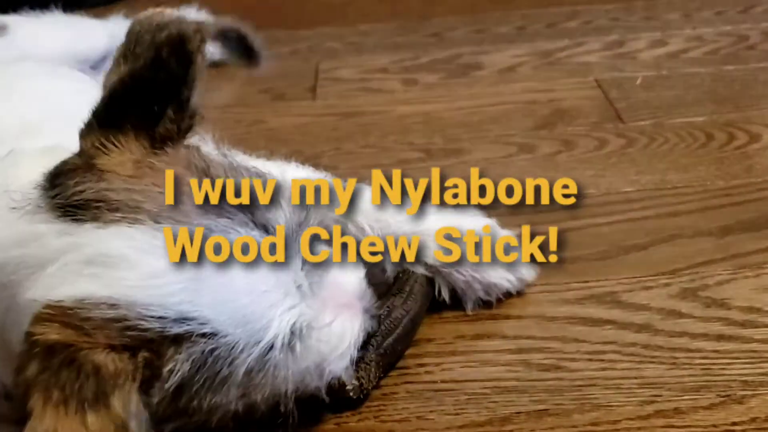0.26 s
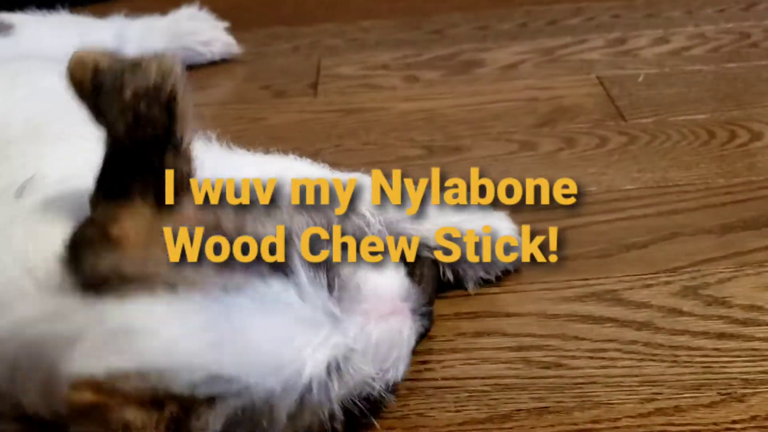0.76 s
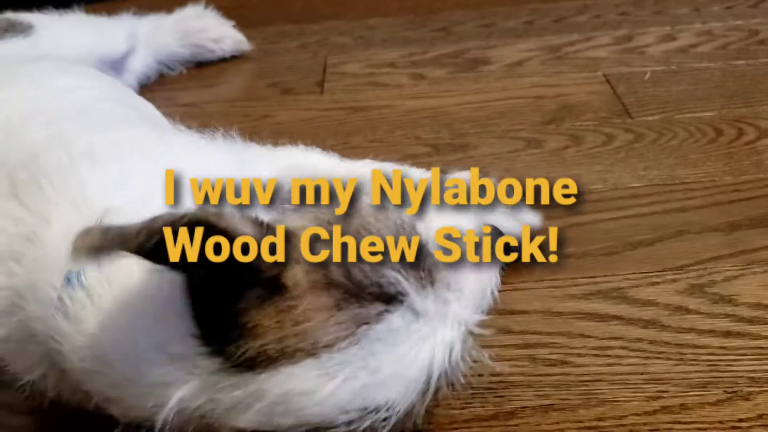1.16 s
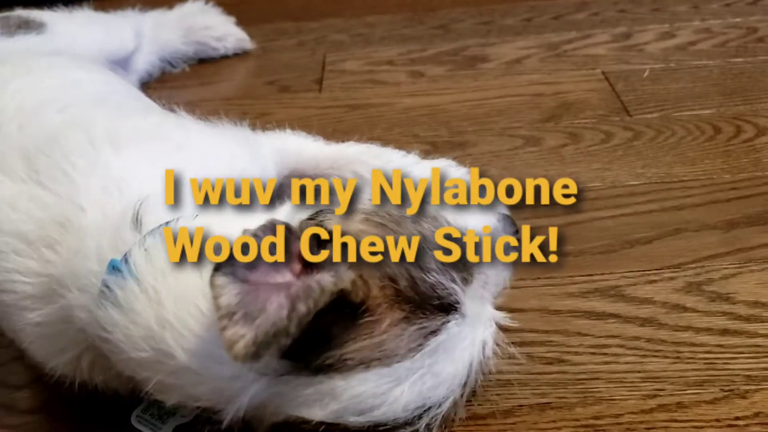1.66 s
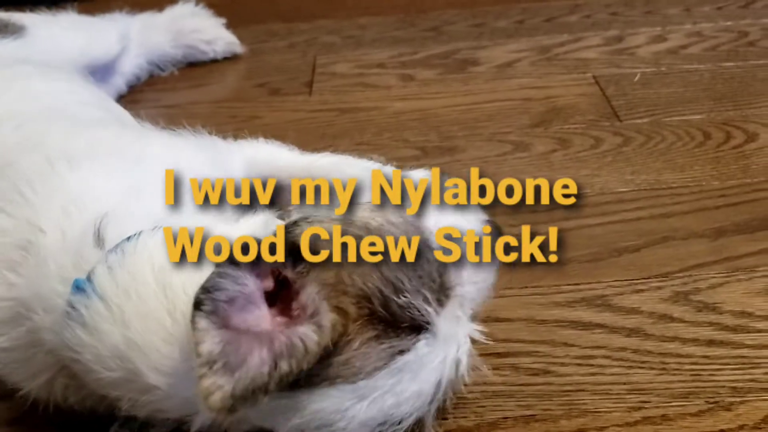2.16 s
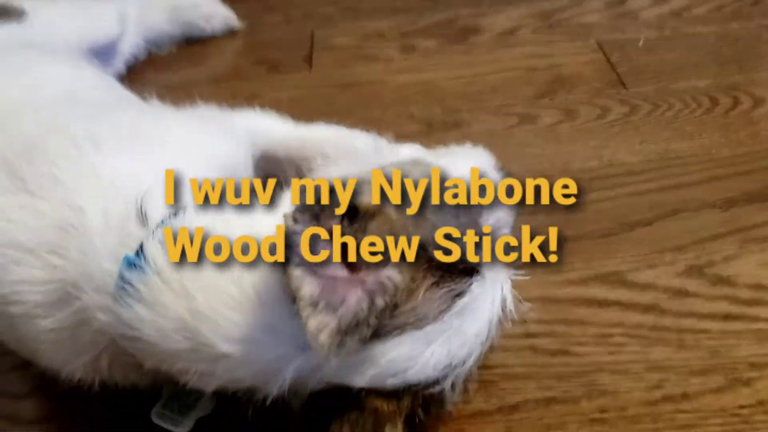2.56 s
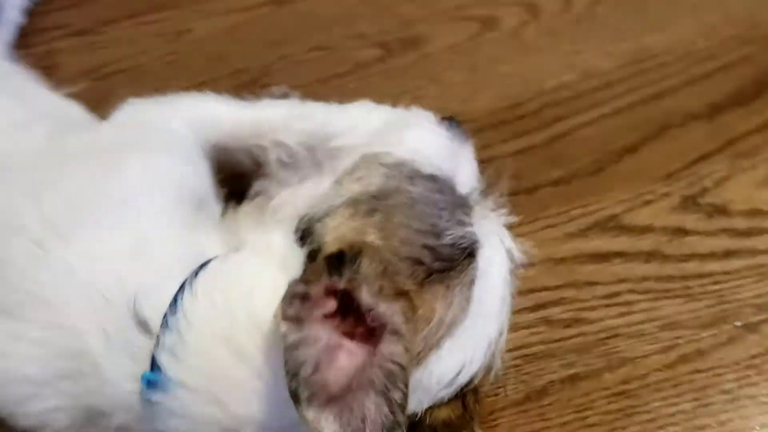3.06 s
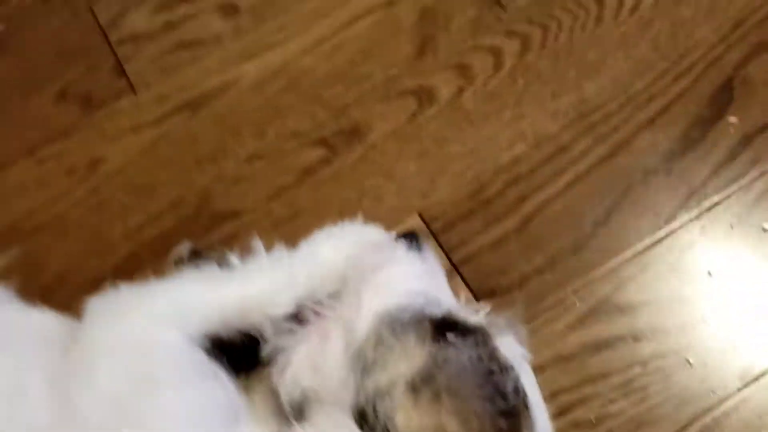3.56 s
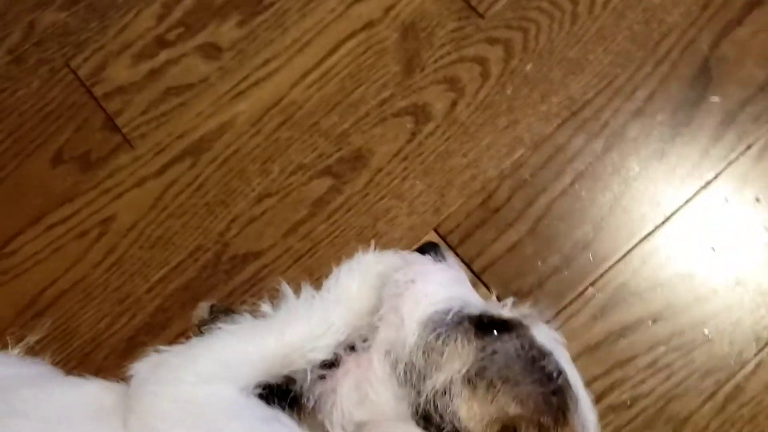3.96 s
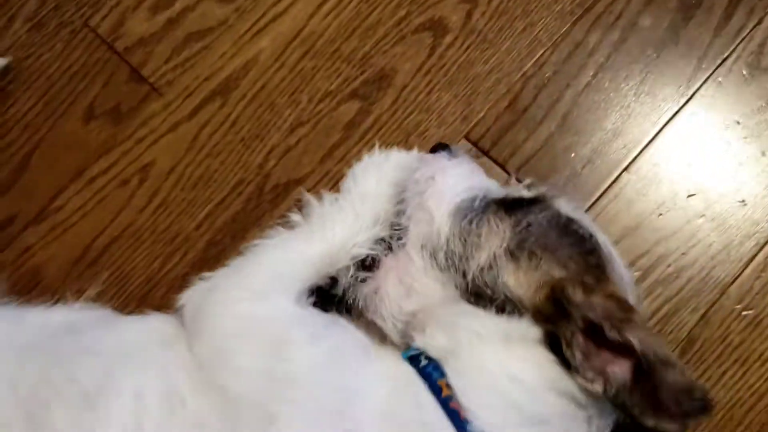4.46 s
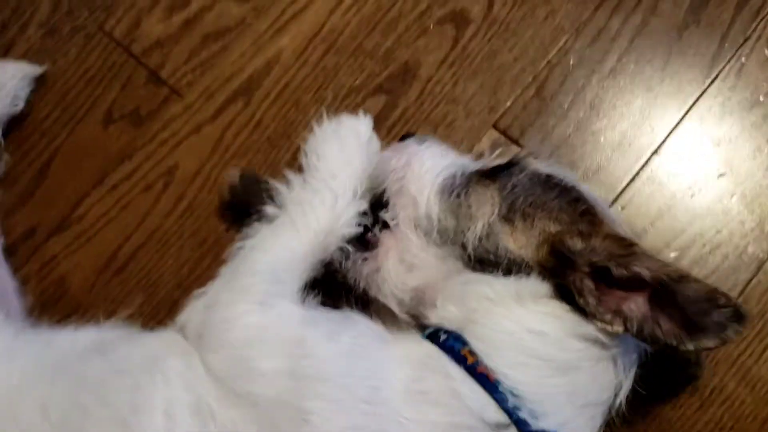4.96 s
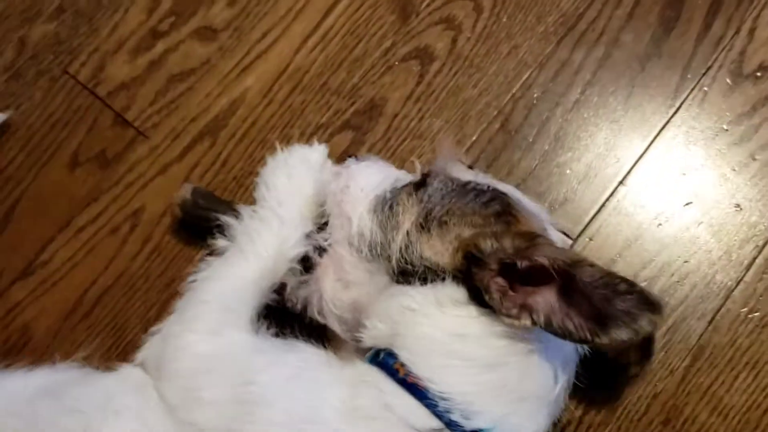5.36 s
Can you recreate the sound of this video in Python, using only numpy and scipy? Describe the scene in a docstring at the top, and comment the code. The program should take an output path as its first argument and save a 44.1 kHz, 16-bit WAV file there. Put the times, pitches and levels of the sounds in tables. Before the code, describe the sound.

In a bare, quiet room with a faint low hum, a dog works at a hard stick on the floorboards. After one loud clatter of teeth and stick, light irregular taps and scrapes go on, then harder knocks and dry cracks come in clusters as the teeth slip off. Tiny ticks and soft rubbing of fur are heard nearby. Everything is close, slightly to the left and lightly reverberant.

```python
"""A puppy gnaws a hard chew stick on the wooden floor of a bare room. Each impact excites damped modes
of the stick and the boards; hard blows crack, and teeth slipping off the stick give a dry crunch.
Dragging drives the same wood by stick-slip friction in short grainy scrapes. Small bright ticks and
the rustle of fur come from close by. The contacts reverberate over faint room noise and the hum of an
appliance, whose low tones beat."""
import sys
import numpy as np
from scipy import signal
from scipy.io import wavfile

SR = 44100
rng = np.random.default_rng(int(sys.argv[2]) if len(sys.argv) > 2 else 0)


def dump_mix(stems):
    """Bounce the given channels to the path in sys.argv[1] as a 16-bit WAV at rate SR."""
    frames = np.atleast_2d(stems).T  # one column per channel
    limited = np.clip(frames, -1, 1)  # hard clip at full scale
    pcm = np.round(limited * 32767).astype(np.int16)
    wavfile.write(sys.argv[1], SR, pcm)


N = 247401

# Room noise and the coarser and finer hiss of fur: f/Hz, relative spectral density/dB
AIR_SPECTRUM = [(53, -39.5), (90, -7), (164, -10.5), (510, -26.5), (799, -37), (1490, -37.5), (5140, -51.5),
                (7400, -51.5), (8600, -64.5), (13800, -52.5), (15000, -61)]
COARSE_FUR_SPECTRUM = [(1470, -17.5), (2500, -11), (3450, -10.5), (3800, -14), (7670, -8.5), (8500, -16),
                       (11000, -44), (18700, -120)]
FINE_FUR_SPECTRUM = [(5180, -40), (8800, -17), (14000, 9), (14700, -7), (15000, -10)]
# Reverberation time: f/Hz, T60/s
ROOM_T60 = [(100, 0.64), (260, 0.21), (700, 0.39), (1800, 0.55), (4800, 0.48), (12000, 0.55)]
# Initial spectrum of the reverberation: f/Hz, relative level/dB
ROOM_SPECTRUM = [(100, -28.5), (260, -19), (700, -21), (1800, -22), (4800, -20), (8000, -20.5),
                 (13000, -50)]
# Likeness of left and right in the diffuse field: f/Hz, correlation
COHERENCE = [(60, 0.45), (250, 0.88), (700, 0.38), (1500, -0.14), (5000, 0.027), (14000, -0.23)]
# Partials of the appliance: f/Hz, level/dB, wavering/dB
HUM_PARTIALS = [(59.2, -52, 1), (74, -58, 2), (120, -66, 2)]
# Slow swell of the hum: t/s, gain/dB
HUM_SWELL = [(0, 0.5), (1.2, -1.5), (2.2, -2), (3.0, 3), (4.3, 2), (5.61, -0.5)]
# Envelopes of fur rubbing and of the stick dragging on the boards: t/s, level/dB
FUR_RUB = [(0, -58), (.04, -66), (.07, -52), (.3, -99), (.55, -84.5), (.84, -86), (1.67, -85), (2.2, -88),
           (2.62, -76), (2.88, -70.5), (2.98, -58), (3.07, -61.5), (3.14, -85), (3.6, -70.5), (3.9, -83.5),
           (4.17, -79), (4.5, -65.5), (4.75, -70), (5.03, -83), (5.3, -81), (5.45, -70.5), (5.61, -81.5)]
STICK_DRAG = [(0, -40), (.25, -55.5), (.61, -87), (1.11, -63), (1.25, -91), (1.48, -57.5), (1.65, -77),
              (2.05, -75), (2.45, -57.5), (2.95, -68), (3.11, -50), (3.34, -65), (3.82, -54), (4.0, -83),
              (4.29, -43.5), (4.42, -65), (4.63, -50.5), (4.95, -78.5), (5.2, -48), (5.61, -71.5)]
# Sudden stirs of the fur: t/s, coarse level/dB, fine level/dB, decay rate/(dB/s)
FUR_STIRS = [(0.849, -76, -69, 149), (0.961, -60, -58, 207), (1.92, -87, -102, 58), (4.178, -57.5, -56, 81),
             (4.871, -71, -68, 14)]
# Normal modes of the boards, stick, cracks, crunches and ticks: f/Hz, gain/dB, T60/s
BOARD_MODES = [(98.1, -34, 0.08), (169, -5.5, 0.15), (255, -2, 0.044), (319, 0, 0.019), (388, -4.5, 0.046),
               (475.6, -2, 0.037), (584, -5.5, 0.035)]
STICK_LOW_MODES = [(714, -5.5, 0.028), (768.5, -4.5, 0.022), (1005, -3.5, 0.0076)]
STICK_HIGH_MODES = [(1080, 1, 0.014), (1210, 0, 0.0068), (1429, -3.5, 0.022), (1620, -1.5, 0.0061),
                    (1762, -3.5, 0.014), (2038, -5.5, 0.012), (2060, -11.5, 0.033)]
CRACK_MODES = [(2270, 4, 0.0083), (2680, -5.5, 0.0042), (2783, -6.5, 0.008), (3590, -21, 0.0052)]
CRUNCH_MODES = [(2120, 5.5, 0.0046), (2544, 4, 0.01), (2880, -0.5, 0.0034), (3800, 0, 0.003),
                (5250, -5.5, 0.00091), (7000, -8, 0.0014)]
TICK_LOW_MODES = [(6150, -16.5, 0.012), (7540, 3.5, 0.015)]
TICK_HIGH_MODES = [(10200, -8, .003), (12500, -6, .003), (14100, -2, .005)]
# Where the held stick responds best, among its low and its high modes: t/s, f/Hz
STICK_LOW_CENTRE = [(0, 888), (1.2, 849), (2.1, 843), (3.08, 944), (3.7, 815), (4.2, 770), (4.35, 780),
                    (4.9, 760), (5.61, 760)]
STICK_HIGH_CENTRE = [(0.045, 1310), (0.067, 1820), (0.1, 1680), (0.5, 1490), (1.013, 2060), (1.12, 1540),
                     (1.25, 1360), (2.09, 1437), (2.55, 1350), (3.0, 1460), (3.09, 1590), (3.3, 1500),
                     (3.71, 1614), (4.18, 1760), (4.25, 1480), (4.32, 1730), (4.36, 1470), (4.65, 1250),
                     (4.9, 1820), (5.05, 1570), (5.19, 1580), (5.61, 1380)]
# Bright ticks: t/s, drive level of low modes/dB, of high modes/dB
TICKS = [(0.0707, -72, -29), (0.509, -90, -69.5), (0.85, -58.5, -72), (0.9607, -60.5, -46.5),
         (0.9729, -62, -46), (1.056, -64, -76), (1.921, -75.5, -84.5), (2.2438, -71.5, -51.5),
         (2.796, -66, -51), (3.086, -78.5, -49), (3.711, -68, -83), (3.747, -64.5, -77), (4.182, -62, -60),
         (4.2696, -60, -46), (4.3181, -82, -49), (5.084, -68, -53.5)]
# Teeth slipping off the stick: t/s, drive level/dB, centre f/Hz, chatter decay time/ms
CRUNCHES = [(0.0434, -35, 3800, 1.5), (0.0674, -11, 2440, 4.5), (0.0848, -28, 2300, 2),
            (0.0985, -22.5, 2500, 2.8), (0.85, -50, 3520, 0.43), (0.9725, -63, 4750, 2),
            (1.011, -48, 2400, 0.82), (1.2395, -45, 2680, 0.9), (2.092, -48, 2320, 1.8),
            (3.084, -20.5, 3600, 3.6), (3.301, -38.5, 2430, 2.7), (4.181, -25.5, 5320, 3.6),
            (4.3182, -24, 2750, 2.2), (4.3645, -55, 2800, 2), (4.905, -26.5, 2280, 1),
            (4.922, -46, 3000, 10), (5.0547, -40, 2300, 2), (5.1848, -31, 2320, 5)]
# Blows of the stick: t/s, drive level of boards/dB, of low stick modes/dB, of high stick modes/dB,
# centre f of boards/Hz, chatter decay time/ms
KNOCKS = [(0.0446, -9.5, -20, -16, 467, 5), (0.0684, -9, -17, -12, 535, 4.4),
          (0.0754, -10.5, -36, -36, 305, 6.2), (0.0837, -19.5, -15, -19.5, 342, 5.1),
          (0.0985, -15.5, -21.5, -15.5, 376, 18), (0.508, -39, -52.5, -42, 318, 17),
          (0.54, -29.5, -38.5, -45.5, 412, 1.7), (0.5733, -34.5, -75.5, -57.5, 343, 5.4),
          (0.585, -40, -65, -62, 348, 7), (0.6323, -33.5, -45, -51, 436, 0.75),
          (0.8475, -51, -52, -48, 344, 0.47), (1.013, -75, -66, -41.5, 209, 0.4),
          (1.063, -33, -47, -71, 346, 42), (1.112, -30.5, -41.5, -46, 364, 13),
          (1.124, -37.5, -41, -42.5, 410, 0.63), (1.1427, -31.5, -42, -39.5, 440, 1.4),
          (1.1634, -27, -41.5, -61, 364, 6.4), (1.2148, -23.5, -34.5, -36.5, 448, 0.43),
          (1.2276, -21, -33, -27.5, 430, 15), (1.2354, -61, -36, -33, 497, 7.4),
          (1.247, -34, -29, -35.5, 410, 3.4), (1.3347, -38.5, -33.5, -45, 422, 6.9),
          (1.346, -34.5, -74.5, -42.5, 464, 53), (1.4419, -42.5, -51.5, -66, 451, 17),
          (1.4847, -40.5, -75, -79, 412, 1.06), (1.5222, -46, -68, -55, 366, 1.96),
          (1.5507, -29.5, -48.5, -53, 380, 13), (1.6013, -38, -65.5, -57.5, 408, 18),
          (1.619, -36, -62.5, -59.5, 462, 11.5), (1.784, -42, -67.5, -65.5, 461, 9.8),
          (1.9139, -36.5, -68.5, -72, 487, 2.05), (1.9949, -30.5, -50.5, -68.5, 416, 6.9),
          (2.0748, -22, -62, -83.5, 349, 9.7), (2.09, -20.5, -29, -26, 532, 6.7),
          (2.326, -37.5, -59, -56, 239, 16), (2.4072, -38.5, -61.5, -49.5, 248, 3.9),
          (2.433, -32.5, -69, -58.5, 403, 1.1), (2.4474, -17.5, -32, -33.5, 390, 3.5),
          (2.4785, -21, -28.5, -27.5, 463, 0.56), (2.539, -27, -32, -37.5, 431, 1.5),
          (2.688, -35, -56, -62.5, 323, 2.3), (2.842, -30.5, -78, -57.5, 345, 4),
          (2.95, -32.5, -41.5, -60, 420, 0.79), (2.978, -26.5, -51, -51, 307, 15),
          (2.996, -26.5, -65, -43, 390, 14), (3.0069, -11, -15.5, -24, 388, 2.5),
          (3.0839, -11, -16.5, -13.5, 416, 0.086), (3.0988, -20.5, -36, -28, 460, 5.6),
          (3.2789, -17.5, -30, -75, 390, 21), (3.3003, -21.5, -30, -24.5, 399.3, 11),
          (3.4229, -30.5, -42, -64, 204, 0.23), (3.5032, -29, -54, -50, 220.6, 2.5),
          (3.514, -27.5, -25, -87, 474, 10), (3.538, -32, -63, -72, 278, 6.1),
          (3.5981, -23.5, -34.5, -39, 410, 10.4), (3.6533, -25, -36, -46, 413, 5.2),
          (3.693, -26, -60, -62, 350, 0.95), (3.7126, -20, -21.5, -24.5, 410, 5.3),
          (4.003, -40.5, -62.5, -73, 360, 12), (4.106, -26.5, -43, -74, 225, 23),
          (4.1804, -11, -14.5, -22.5, 410, 4), (4.242, -26, -32, -29, 388, 22),
          (4.3183, -17.5, -18.5, -21, 420, 4.2), (4.351, -25, -22, -26.5, 394, 6.2),
          (4.3639, -21, -18.5, -27, 427, 10.7), (4.599, -25, -31.5, -38, 388, 30),
          (4.645, -28, -26, -30, 250, 68), (4.6539, -28, -32, -35.5, 440, 0.67),
          (4.711, -30.5, -35.5, -67, 373, 1.2), (4.8863, -33.5, -40, -50, 231.5, 6.5),
          (4.906, -29.5, -18, -22, 377, 3.1), (4.9169, -26, -29.5, -57, 377, 41),
          (4.997, -30.5, -35, -43, 325, 62), (5.0558, -23.5, -28, -32, 265, 3.2),
          (5.1847, -22, -17.5, -22.5, 363, 14), (5.203, -34, -29, -35, 223, 30),
          (5.242, -34.5, -25, -36, 360, 4.4), (5.3006, -33, -45, -49, 446, 5),
          (5.3584, -24, -31.5, -40.5, 290, 11.5), (5.504, -36, -32, -48, 458, 19)]

BOARD_PAN_DB, STICK_PAN_DB, TICK_PAN_DB = 3.5, 6.5, 28   # left minus right


def from_db(db):
    """Amplitude ratio of a level in decibels."""
    return np.exp(np.asarray(db) * np.log(10) / 20)


def unit_rms(x):
    """Normalisation to unit mean power."""
    return x / np.sqrt(np.mean(x ** 2) + 1e-20)


def at_time(points, t):
    """Linear interpolation in time."""
    return np.interp(t, *np.transpose(points))


def at_hz(points, hz):
    """Linear interpolation in log frequency."""
    freqs, values = np.transpose(points)
    return np.interp(np.log(hz), np.log(freqs), values)


def drift(rate_hz):
    """Low-passed Gaussian noise: a slow fluctuation of unit rms."""
    step = 40   # samples
    r = np.exp(-2 * np.pi * rate_hz * step / SR)
    slow = signal.lfilter([1], [1, -2 * r, r * r], rng.standard_normal(N // step + 2002))[2000:]
    return np.interp(np.arange(N) / step, np.arange(len(slow)), unit_rms(slow))


def diffuse_bands(length, low_hz, top_hz):
    """A diffuse field in third octaves: left and right are correlated mainly at long wavelengths."""
    white = rng.standard_normal((2, 2, length))
    edges = 1000 * 2 ** (np.arange(-12, 13) / 3)
    for k, (low, high) in enumerate(zip(edges, edges[1:])):
        hz = np.sqrt(low * high)
        if low_hz < hz < top_hz:
            bandpass = signal.butter(2, [low, high], "band", fs=SR, output="sos")
            mid, side = signal.sosfilt(bandpass, white[k % 2])
            alike = at_hz(COHERENCE, hz)
            yield hz, np.sqrt(1 + alike) * mid + np.sqrt(1 - alike) * side * [[1], [-1]]


def hiss(spectrum, flicker_db, rate_hz):
    """Coloured noise of unit rms with independent amplitude modulation in each band."""
    bands = diffuse_bands(N, spectrum[0][0], spectrum[-1][0] * 1.1)
    return unit_rms(sum(from_db(at_hz(spectrum, hz) + flicker_db * drift(rate_hz)) * band
                        for hz, band in bands))


def room_noise():
    """Ambient noise: a faint diffuse field, strongest in the bass."""
    return from_db(-62) * hiss(AIR_SPECTRUM, flicker_db=4.5, rate_hz=1.1)


def appliance_hum():
    """Superposition: wavering low tones, the lowest two beating at their difference frequency."""
    t = np.arange(N) / SR
    tones = sum(from_db(db + waver_db * drift(rate_hz=2.9)) * np.sin(2 * np.pi * (hz * t + rng.random()))
                for hz, db, waver_db in HUM_PARTIALS)
    return np.sqrt(2) * tones * from_db(at_time(HUM_SWELL, t)) * from_db([[.4], [-.4]])


def reverberation(source):
    """Dense reflections build up after the first wall, then decay exponentially in each band."""
    t = np.arange(SR) / SR
    first_echo_s, echo_db = .012, -18
    tail = sum(band * from_db(at_hz(ROOM_SPECTRUM, hz) - 60 * t / at_hz(ROOM_T60, hz))
               for hz, band in diffuse_bands(SR, 0, SR))
    onset = np.clip(t / first_echo_s - .5, 0, 1)
    return signal.fftconvolve(source[:1], tail * onset * from_db(echo_db), axes=1)[:, :N]


def fur_rustle():
    """Friction noise of hairs on wood, coarse and fine, with sudden stirs that decay exponentially."""
    t = np.arange(N) / SR
    envelopes = from_db(at_time(FUR_RUB, t) + np.array([[-3.5], [0]]))   # coarse, fine
    for start, coarse_db, fine_db, db_per_s in FUR_STIRS:
        stir_db = np.array([[coarse_db], [fine_db]]) - db_per_s * np.abs(t - start)
        envelopes += (t >= start) * from_db(stir_db)
    coarse = envelopes[0] * hiss(COARSE_FUR_SPECTRUM, flicker_db=2.2, rate_hz=12)
    fine = envelopes[1] * hiss(FINE_FUR_SPECTRUM, flicker_db=2.5, rate_hz=15)
    return (coarse + fine) * from_db([[3], [-3]])


def random_coupling(modes, spread_db):
    """Modal coupling in dB varies with the contact point, which wanders every few milliseconds."""
    draws = 2 * rng.random((len(modes), N // 256 + 1)) - 1
    return spread_db * np.repeat(draws, 256, axis=1)[:, :N]


def tuned_coupling(modes, times, centre_hz, octaves, floor_db=-14.5):
    """Modal coupling in dB falls with distance from the centre frequency of the latest contact."""
    latest = np.maximum(np.searchsorted(times, np.arange(1, N + 1) / SR) - 1, 0)
    centre = centre_hz[latest]
    return [floor_db * (1 - np.exp(-(np.log2(hz / centre) / octaves) ** 2)) for hz, _, _ in modes]


def ring(force, modes, coupling_db):
    """Modal synthesis: a force drives damped resonators, summed in two stereo sets, even and odd."""
    sets = np.zeros((2, 2, N))
    for k, ((hz, gain_db, t60), mode_db) in enumerate(zip(modes, coupling_db)):
        r, w = from_db(-60 / (t60 * SR)), 2 * np.pi * hz / SR
        polarity = np.repeat(rng.choice([-1, 1], N // 256 + 1), 256)[:N]   # a blow pushes either way
        drive = force * polarity * from_db(gain_db + mode_db) + 1e-18
        sets[k % 2] += signal.lfilter([0, np.sin(w)], [1, -2 * r * np.cos(w), r * r], drive)
    margin = 1.5   # a rounded contact reaches this frequency ratio beyond the outermost modes
    highpass = signal.butter(1, modes[0][0] / margin, "high", fs=SR, output="sos")
    lowpass = signal.butter(4, min(margin * modes[-1][0], .45 * SR), fs=SR, output="sos")
    return signal.sosfilt(np.vstack([highpass, lowpass]), sets)


def arrival_lags(count):
    """Path difference in samples: the dog is nearer the left, by an amount set by the point struck."""
    return 6 + rng.integers(-5, 6, count)


def chatter(decay_ms, slips_per_s):
    """Contact forces of unit energy: a first impulse, then random slips that die exponentially."""
    ms = np.arange(SR // 20) / SR * 1000
    size = (len(decay_ms), len(ms))
    slips = rng.standard_normal(size) * (rng.random(size) < slips_per_s / SR)
    slips[:, 0] = 1.66
    pulses = slips * np.exp(-ms / np.maximum(decay_ms, .1)[:, None])
    return pulses / np.linalg.norm(pulses, axis=1, keepdims=True)


def soften(pulse, corner_hz):
    """A longer contact has a narrower spectrum: two one-pole low-passes."""
    r = np.exp(-2 * np.pi * corner_hz / SR)
    return signal.lfilter([(1 - r) ** 2], [1, -2 * r, r * r], pulse)


def force_train(times, level_db, pan_db, pulses, lags):
    """A train of contact pulses, placed in stereo by differences of level and arrival time."""
    force = np.zeros((2, N + pulses.shape[1]))
    for start, pulse, db, lag in zip((times * SR).astype(int), pulses, level_db, lags):
        force[0, start:start + len(pulse)] += pulse * from_db(db + pan_db / 2)
        force[1, start + lag:start + lag + len(pulse)] += pulse * from_db(db - pan_db / 2)
    return force[:, :N]


def ticks():
    """Impulse responses of tiny hard contacts: high modes that die within milliseconds."""
    times, low_db, high_db = np.transpose(TICKS)
    impulses, lags = np.ones((len(times), 1)), arrival_lags(len(times))
    sound = 0
    for modes, db, spread_db in [(TICK_LOW_MODES, low_db, 1.7), (TICK_HIGH_MODES, high_db, 3.8)]:
        force = force_train(times, db, TICK_PAN_DB, impulses, lags)
        sound += ring(force, modes, random_coupling(modes, spread_db))
    return sound


def stick_scrape():
    """Stick-slip friction: uneven slips come in clumps and excite the boards and the stick."""
    slips_per_s, spread_db, stick_db = 1200, 2.5, -19.5
    sizes = from_db(spread_db * np.minimum(rng.exponential(1, N), 4)) * rng.choice([-1, 1], N)
    slips = sizes * (rng.random(N) < slips_per_s * from_db(5 * drift(rate_hz=15)) / SR)
    boards = unit_rms(ring(slips, BOARD_MODES, random_coupling(BOARD_MODES, spread_db=5)))
    stick = unit_rms(ring(slips, STICK_HIGH_MODES, random_coupling(STICK_HIGH_MODES, spread_db=1.1)))
    envelope = from_db(at_time(STICK_DRAG, np.arange(N) / SR))
    return envelope * (boards + from_db(stick_db) * stick) * from_db([[1.8], [-1.8]])


def tooth_crunches():
    """Teeth slip off the stick in rapid clicks; heavy damping makes the resonances broad and dry."""
    times, db, centre_hz, decay_ms = np.transpose(CRUNCHES)
    pulses = chatter(decay_ms, slips_per_s=3000)
    force = force_train(times, db, STICK_PAN_DB, pulses, arrival_lags(len(times)))
    coupling = tuned_coupling(CRUNCH_MODES, times, centre_hz, octaves=.97, floor_db=-16.5)
    return ring(force, CRUNCH_MODES, coupling)


def stick_knocks():
    """Impact excitation of boards and stick: harder blows make shorter, brighter contacts and crack."""
    times, board_db, low_db, high_db, board_hz, decay_ms = np.transpose(KNOCKS)
    corners_hz = 5400 * from_db(.21 * high_db)
    pulses = chatter(decay_ms, slips_per_s=980)
    pulses = np.array([soften(pulse, hz) for pulse, hz in zip(pulses, corners_hz)])
    lags = arrival_lags(len(times))

    def strike(modes, db, pan_db, coupling):
        return ring(force_train(times, db, pan_db, pulses, lags), modes, coupling)

    stick_gain_db = 7.5   # the stiff stick responds more readily than the boards
    crack_db = 6 + 1.52 * high_db   # the crack grows faster than the blow
    low_hz, high_hz = at_time(STICK_LOW_CENTRE, times), at_time(STICK_HIGH_CENTRE, times)
    board_coupling = tuned_coupling(BOARD_MODES, times, board_hz, octaves=.59)
    boards = strike(BOARD_MODES, board_db, BOARD_PAN_DB, board_coupling)
    low_coupling = tuned_coupling(STICK_LOW_MODES, times, low_hz, octaves=.46)
    high_coupling = tuned_coupling(STICK_HIGH_MODES, times, high_hz, octaves=.38)
    crack_coupling = random_coupling(CRACK_MODES, spread_db=2)
    stick_low = strike(STICK_LOW_MODES, low_db + stick_gain_db, STICK_PAN_DB, low_coupling)
    crack = strike(CRACK_MODES, crack_db, STICK_PAN_DB, crack_coupling)
    stick_high = strike(STICK_HIGH_MODES, high_db + stick_gain_db, STICK_PAN_DB, high_coupling)
    return boards + stick_low + stick_high + crack


def scene():
    """Direct and reverberant sound add; the two sets of modes radiate to different walls."""
    mode_sets = stick_knocks() + tooth_crunches() + ticks() + stick_scrape()
    air = room_noise()
    contacts = sum(direct + reverberation(direct) for direct in mode_sets)
    return contacts + fur_rustle() + air + appliance_hum()


def record(dry):
    """Band limiting and saturation: a microphone passband, rounded peaks, then a steep treble cut."""
    highpass = signal.butter(4, 40, "high", fs=SR, output="sos")
    lowpass = signal.cheby1(8, 1, 14500, fs=SR, output="sos")
    passband = signal.sosfilt(np.vstack([highpass, lowpass]), dry)
    rounded = passband / (1 + passband ** 8) ** (1 / 8)
    return signal.sosfilt(signal.cheby2(12, 50, 15945, fs=SR, output="sos"), rounded)


dry = scene()
out = record(dry)
dump_mix(out)
```